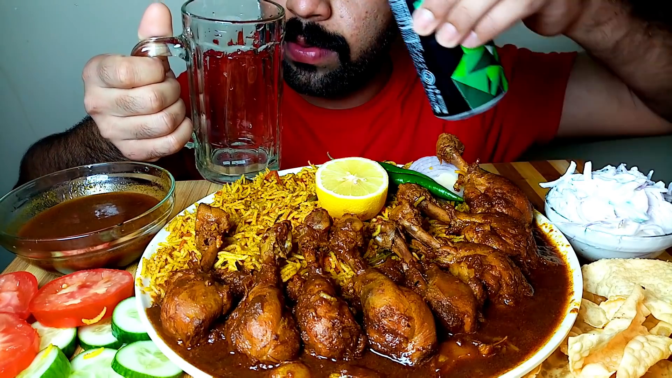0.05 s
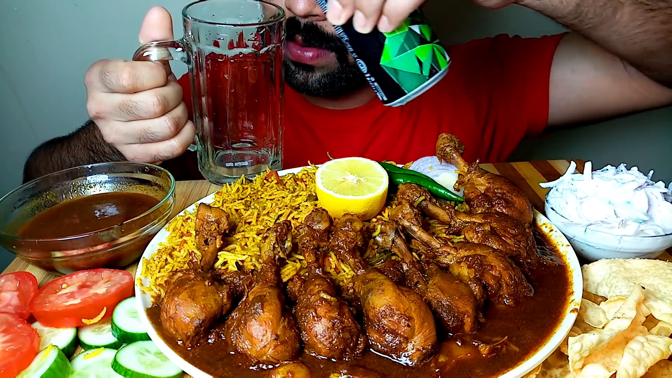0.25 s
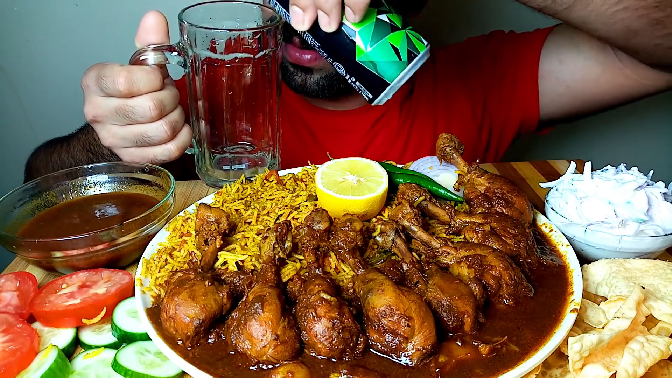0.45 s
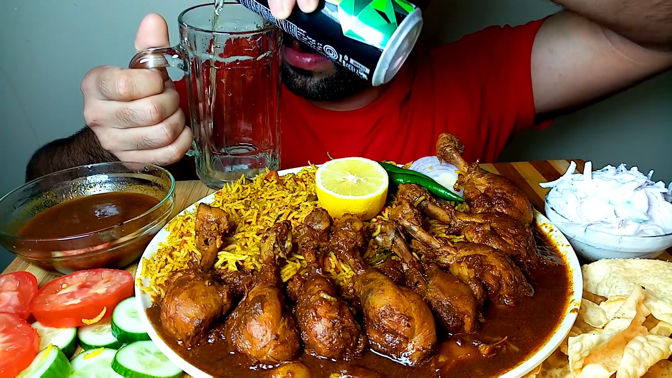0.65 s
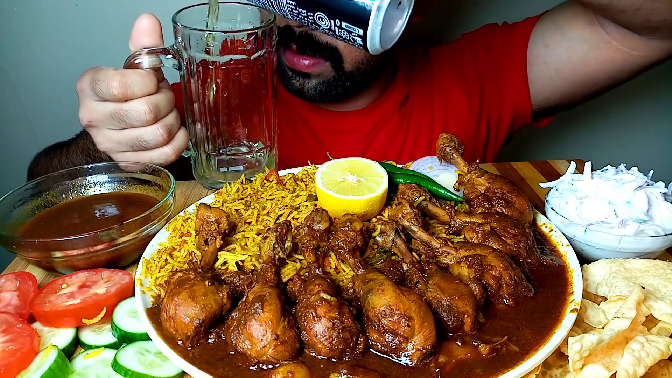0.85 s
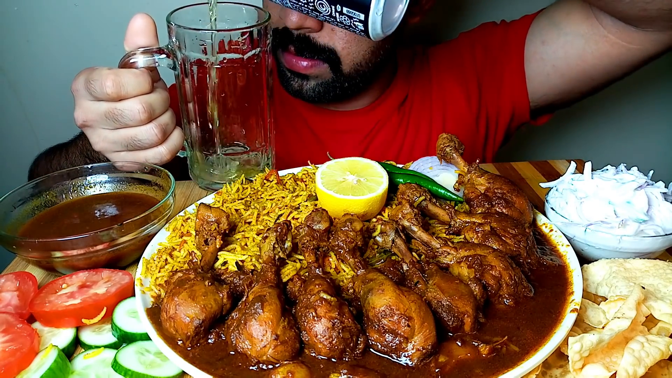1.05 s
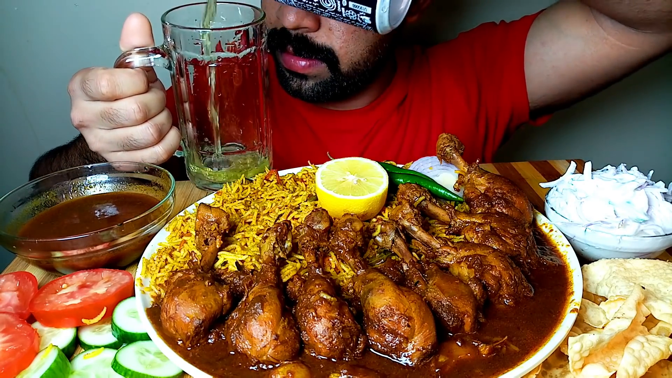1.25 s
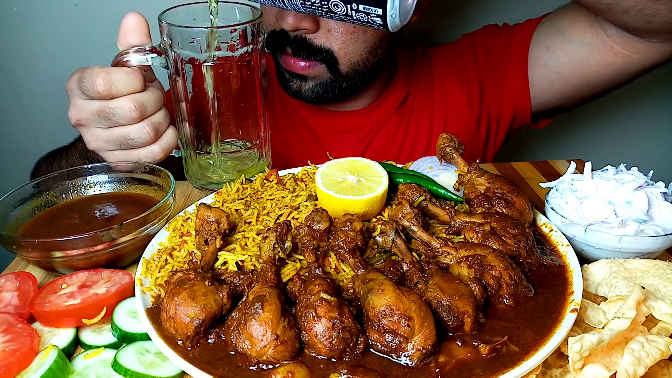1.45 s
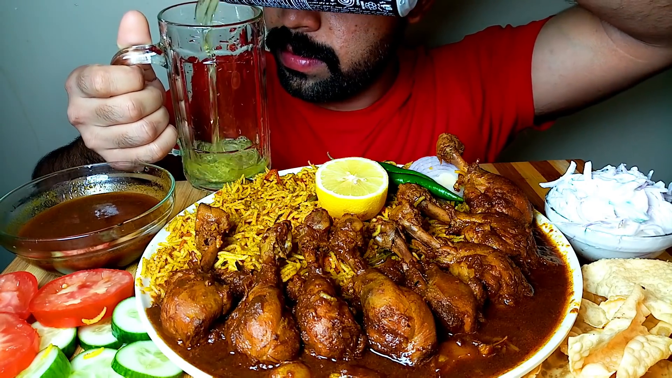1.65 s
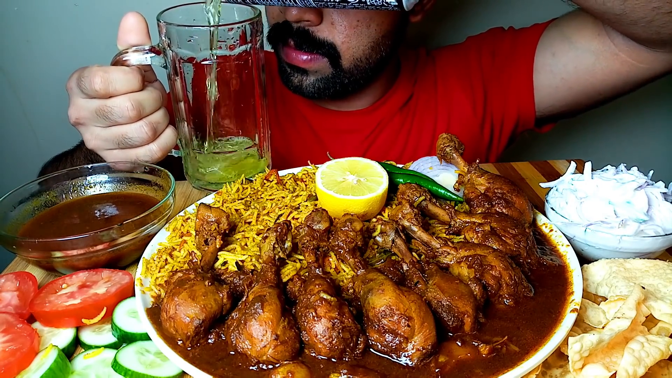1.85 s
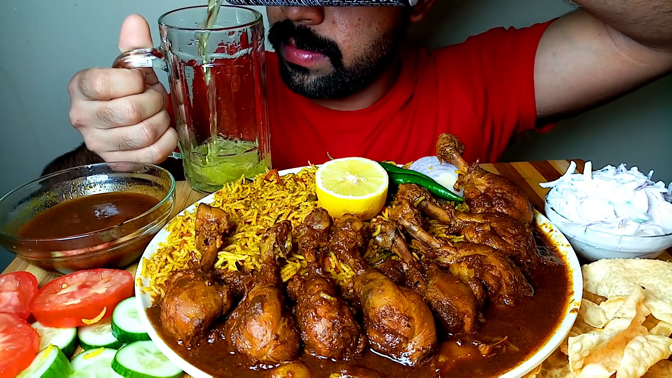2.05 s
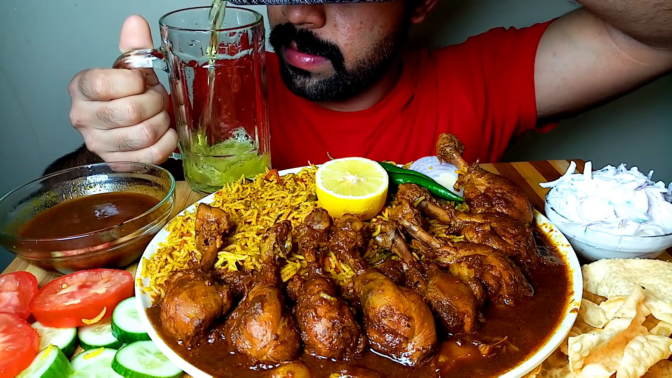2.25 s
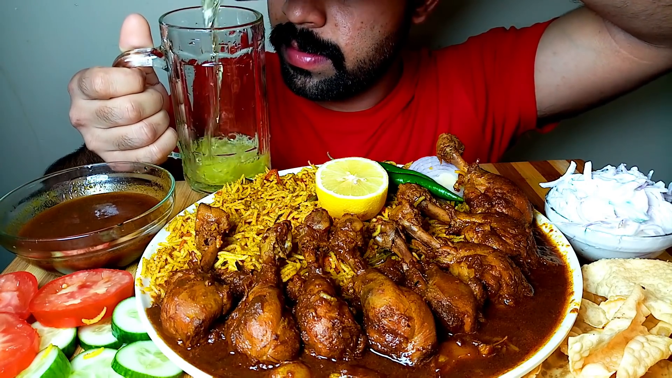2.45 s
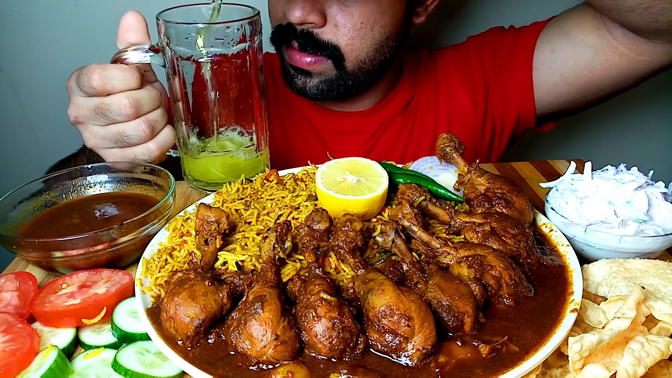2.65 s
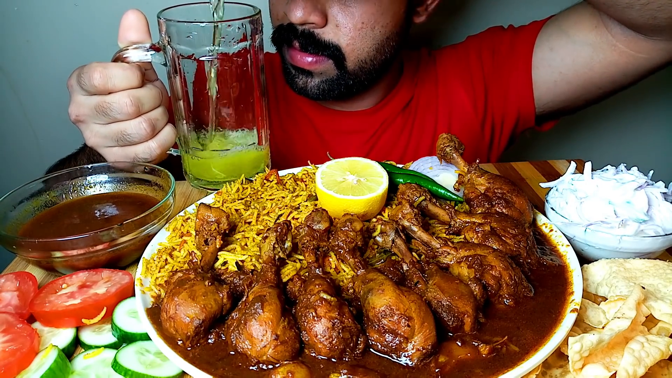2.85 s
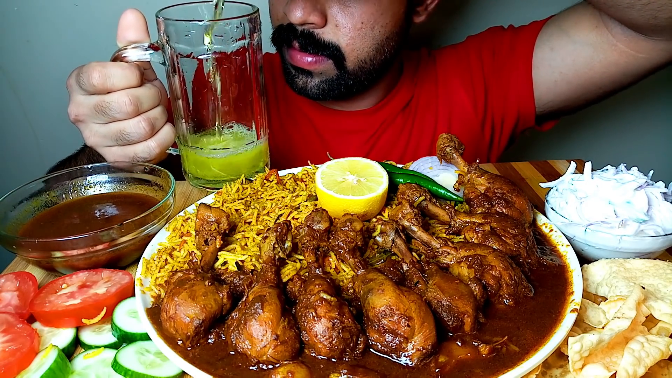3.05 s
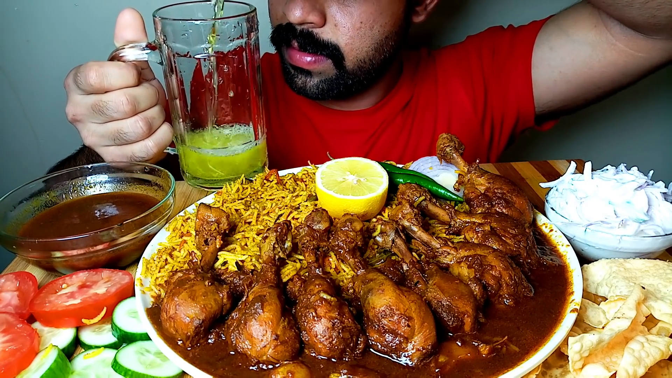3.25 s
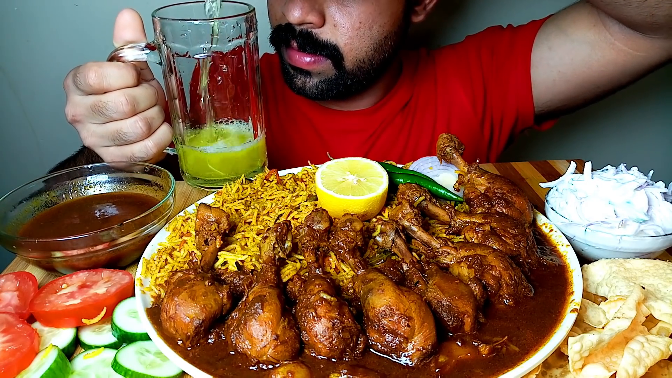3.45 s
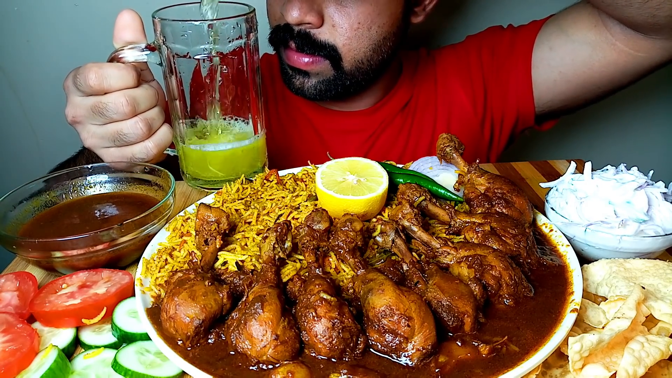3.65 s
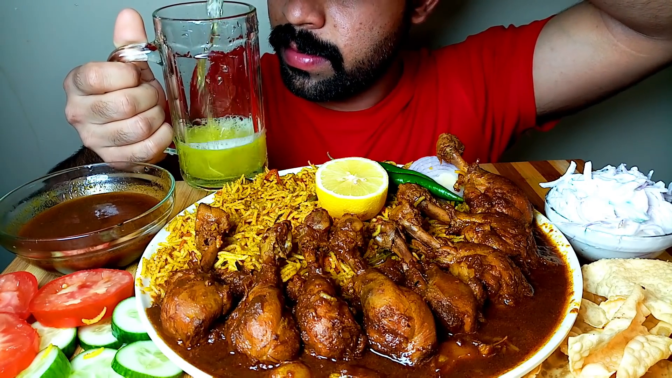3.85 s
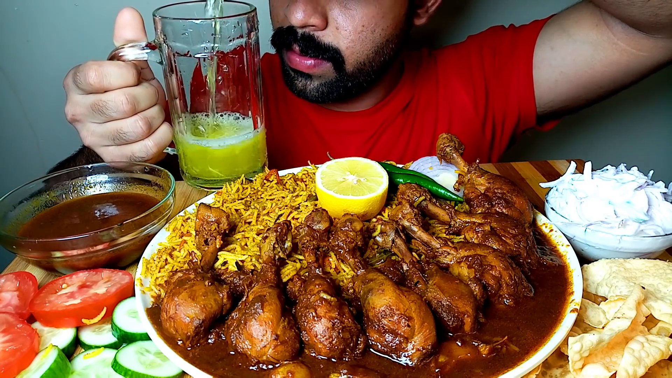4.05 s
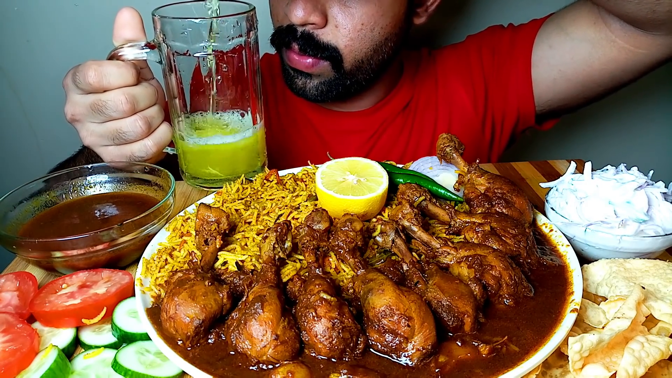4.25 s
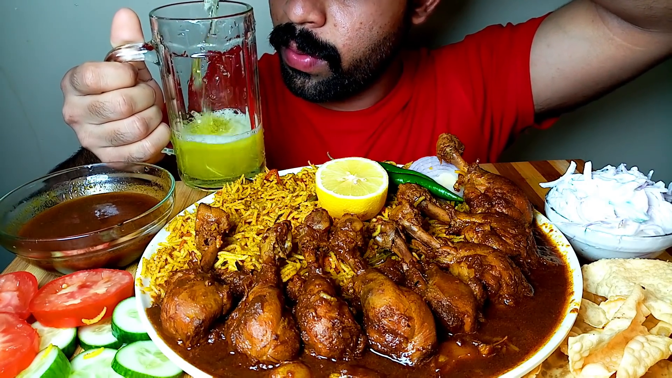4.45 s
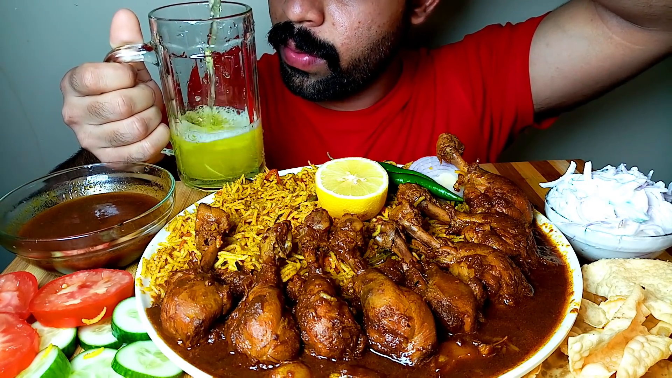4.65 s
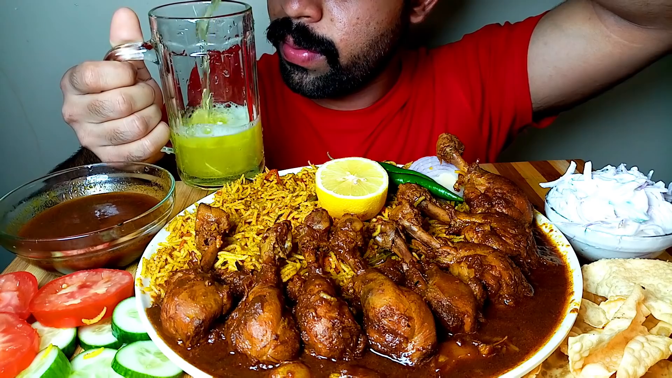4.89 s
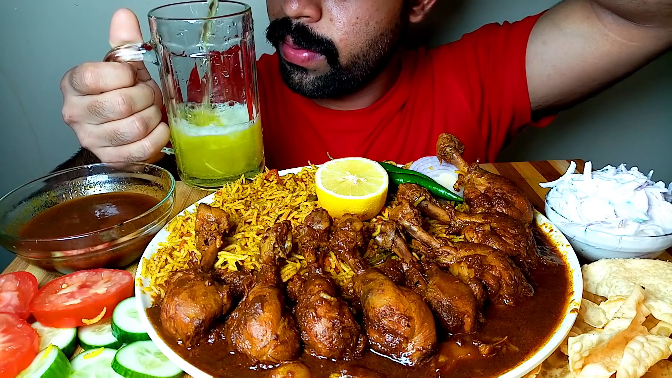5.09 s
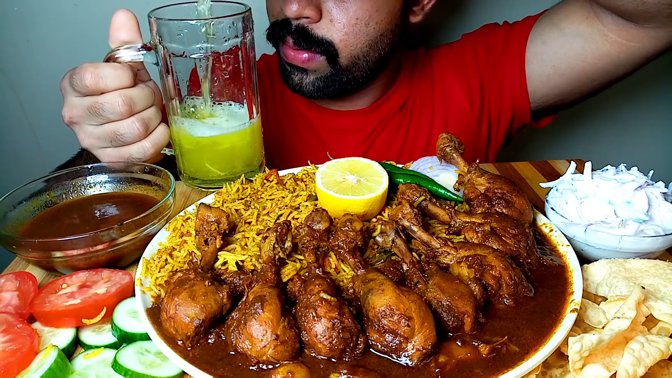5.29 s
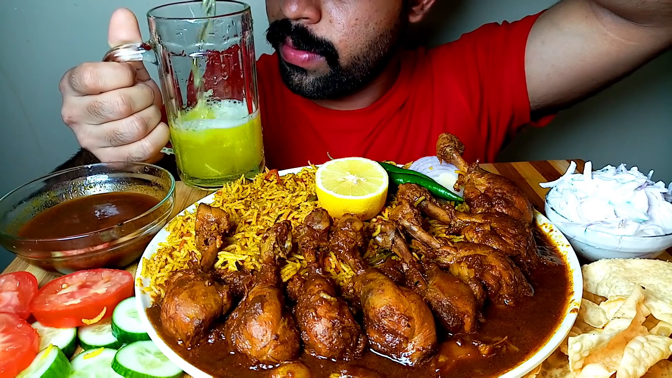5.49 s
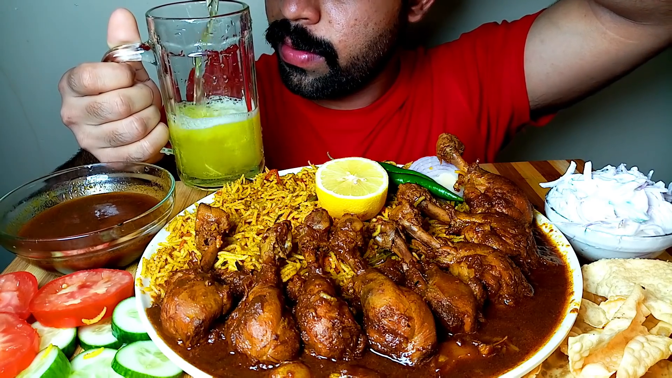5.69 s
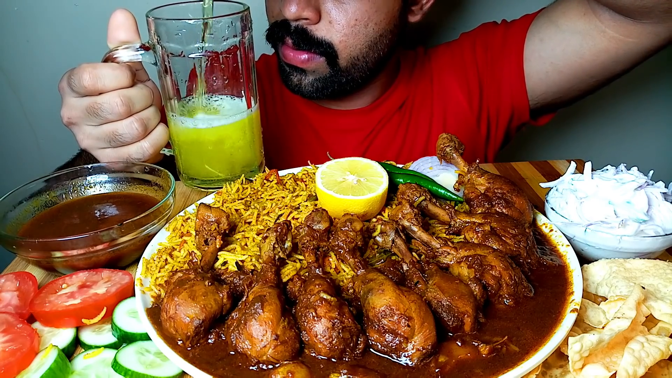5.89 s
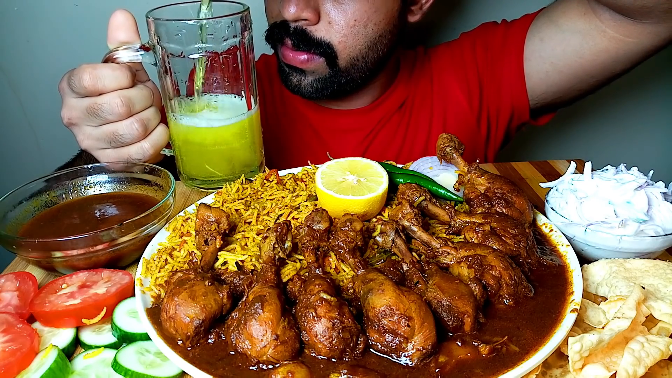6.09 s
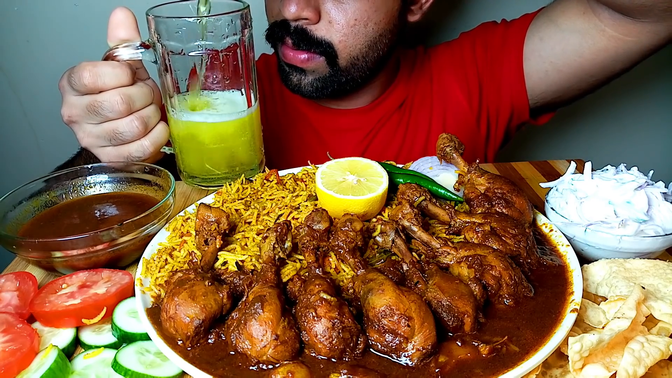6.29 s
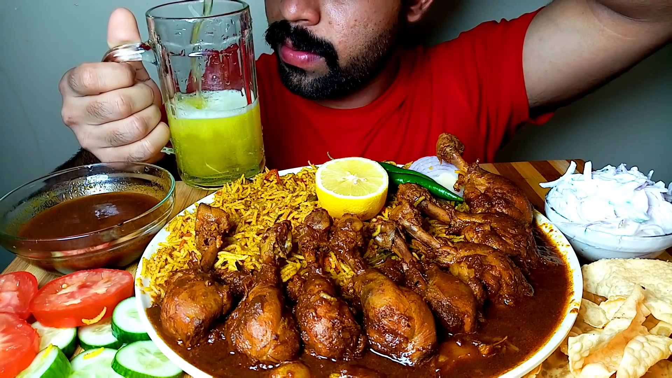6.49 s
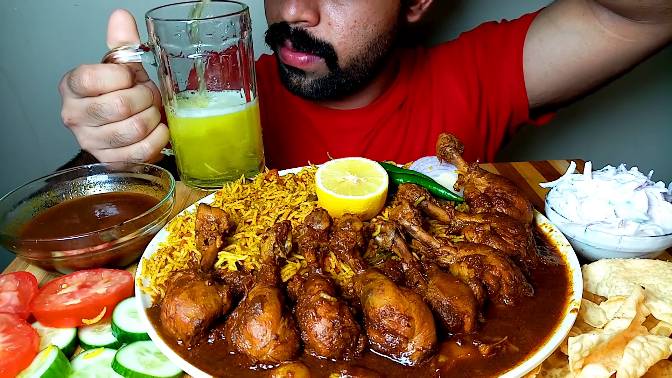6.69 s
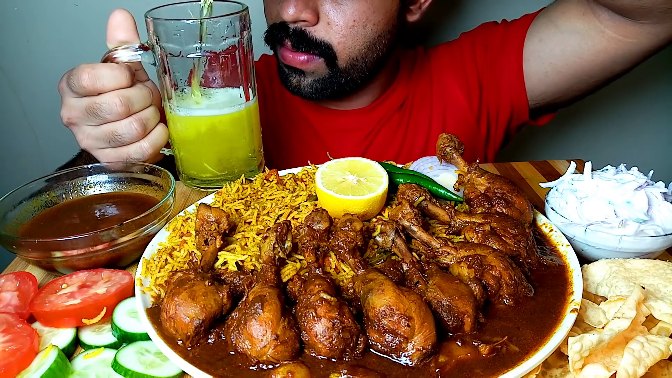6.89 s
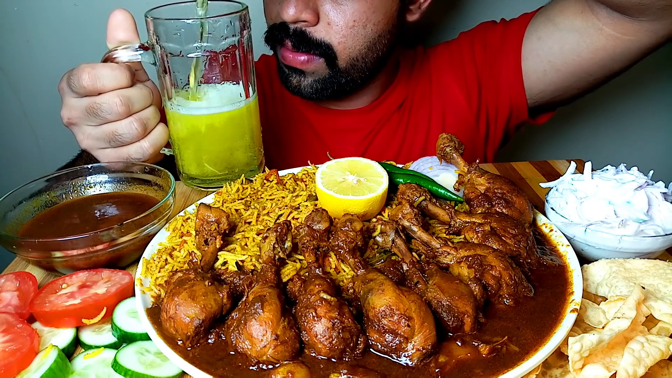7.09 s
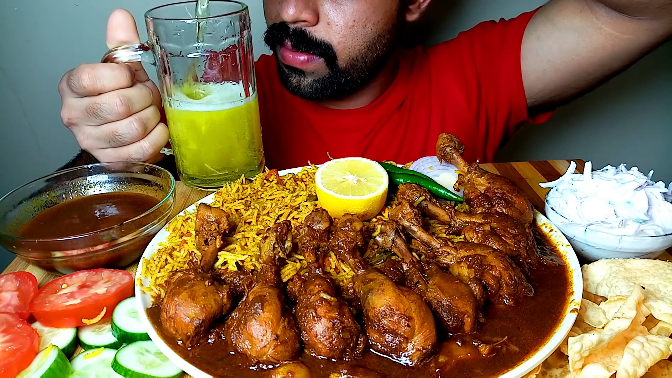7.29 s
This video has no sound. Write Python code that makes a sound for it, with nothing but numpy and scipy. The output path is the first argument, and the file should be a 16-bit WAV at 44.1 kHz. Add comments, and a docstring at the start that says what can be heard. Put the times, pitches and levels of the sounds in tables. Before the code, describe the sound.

A small hard room with very quiet air and barely audible hum, heard closely in stereo. Light table knocks fall at about 0.06, 0.2 and 0.53 s, with faint rubbing. From 0.8 s the first tiny high bubbles ping; by 1.1 s a thin stream of soda patters on the glass bottom, with a bright ringing resonance, sharp droplets and a burst of fizz around 1.2 s. Two more light knocks come at 1.9 and 2.1 s, with dull faint rumble as the mug shifts. Plops begin near 2.1 s, and from 2.75 s dense, irregular, hollow gulps dominate, strongest until about 4 s, rising gradually in pitch while deeper bubbling sinks. Splashes, crackle and fine hiss surround them. After 5 s gulps become more scattered, with a cluster around 5.5 and another near 6.2; then softer small plops and fading fizz continue to 7.3 s.

```python
"""Light knocks at a table and faint rubbing over still room air are heard first; then soda is poured into a mug.
The stream patters on the bare bottom (a resonance driven by clicks), then plunges and gulps air.
Each gulp is a choked pulse that sets the air column ringing, at a pitch that climbs as the mug fills.
Single bubbles are short decaying tones; splashing, fizz and spray are swarms of small resonators.
A small, hard-walled room answers with dense echoes that die away band by band."""
import sys
import numpy as np
from scipy import signal
from scipy.fft import rfft, irfft, next_fast_len
from scipy.io import wavfile

SR = 44100
rng = np.random.default_rng(int(sys.argv[2]) if len(sys.argv) > 2 else 0)


def dump_mix(stems):
    """Bounce the given channels to the path in sys.argv[1] as a 16-bit WAV at rate SR."""
    frames = np.atleast_2d(stems).T  # one column per channel
    limited = np.clip(frames, -1, 1)  # hard clip at full scale
    pcm = np.round(limited * 32767).astype(np.int16)
    wavfile.write(sys.argv[1], SR, pcm)


N = 323253
TIME = np.arange(N) / SR

# pitch of the air column as the mug fills: (time [s], frequency [Hz])
FILLING = [(1.2, 597), (2.9, 652), (3.6, 664), (4.3, 728), (5.0, 744), (6.2, 792), (7.33, 874)]
# pitch of the bubble cloud, which grows and sinks in pitch: (time [s], frequency [Hz])
CLOUD_PITCH = [(2.0, 983), (2.9, 586), (3.7, 498), (4.4, 463), (4.7, 369), (5.2, 418), (6.2, 285),
               (7.33, 250)]
# how hard the stream plunges, before gains: (time [s], air column level [dB], bubble cloud level [dB])
PLUNGING = [(0.8, -84, -101), (1.91, -61.5, -78), (2.55, -59, -67), (2.96, -48, -59), (3.36, -56.5, -63),
            (3.75, -53, -51.5), (4.33, -54, -55), (4.89, -54.5, -58.5), (5.29, -59, -62),
            (5.62, -51.5, -56.5), (6.02, -54.5, -69.5), (6.2, -61, -62), (6.38, -57, -73),
            (6.55, -60.5, -71.5), (7.33, -61, -91)]
# how hard the drink froths, before gains: (time [s], splashing level [dB], fizz level [dB])
FROTHING = [(0.8, -87, -76), (0.91, -104, -72), (1.02, -82, -72), (1.13, -79, -71), (1.24, -89, -51),
            (1.43, -63, -63.5), (1.91, -59, -57), (2.42, -56, -60.5), (2.75, -55.5, -54),
            (2.85, -57.5, -58.5), (3.8, -61, -59.5), (4.05, -60.5, -57), (5.11, -62, -59.5),
            (5.69, -68, -60), (6.4, -67, -63.5), (6.87, -66.5, -68.5), (7.33, -73, -64.5)]


def from_db(db):
    """Amplitude gain is ten to the power of decibels over twenty."""
    return 10 ** (np.asarray(db) / 20)


def rms_one(x):
    """Normalise the mean power: scale to unit rms."""
    return x / np.sqrt(np.mean(x ** 2) + 1e-20)


def in_time(rows, t=TIME):
    """Interpolate each column of a curve linearly at the times t."""
    s, *columns = np.transpose(rows)
    return [np.interp(t, s, c) for c in columns]


def at_hz(points, hz):
    """Interpolate a spectrum on a log-frequency axis."""
    f, value = np.transpose(points)
    return np.interp(np.log(hz + 1e-3), np.log(f), value)


def colour(x, spectrum):
    """Minimum-phase filtering: folding the cepstrum gives a dB spectrum a causal response."""
    n = 2 * next_fast_len(x.shape[-1])
    gain = from_db(at_hz(spectrum, np.fft.rfftfreq(n, 1 / SR)))
    cepstrum = irfft(np.log(gain))
    cepstrum[1:n // 2] *= 2
    cepstrum[n // 2 + 1:] = 0
    return irfft(rfft(x, n) * np.exp(rfft(cepstrum)))[..., :x.shape[-1]]


def add(track, s, sound):
    """Superposition: mix a sound into a track at time s."""
    i = max(round(s * SR), 0)
    track[i:i + len(sound)] += sound[:N - i]


def drift(rate):
    """Slow random modulation: lines between normal deviates of spread 1, `rate` of them a second."""
    knots = rng.standard_normal(N // 100)
    return np.interp(TIME * rate, np.arange(len(knots)), knots)


def random_times(start_s, per_s):
    """A random scatter of independent moments from start_s to the end, on a 10 ms grid."""
    slots = np.arange(0, N / SR, .01)
    return slots[(rng.random(len(slots)) < per_s * slots[1]) & (slots > start_s)]


def grains(per_s, spread_db):
    """Shot noise: random clicks of either sign, many small and a few large; rms 1."""
    steps = np.minimum(rng.exponential(1, N), 4.5)
    sizes = from_db(spread_db * steps) * rng.choice([-1, 1], N)
    return rms_one(sizes * (rng.random(N) < per_s / SR))


def resonate(x, hz, width_hz):
    """A moving resonance by heterodyning: shift hz down to zero, low-pass, shift back; rms 1."""
    turn = np.exp(2j * np.pi * np.cumsum(hz) / SR)
    r = np.exp(-np.pi * width_hz * np.sqrt(2) / SR)
    envelope = signal.lfilter([1], [1, -2 * r, r * r], x / turn)
    return rms_one((envelope * turn).real)


def bubble_swarm(spectrum, per_s, spread_db, cycles):
    """Impulses excite damped resonators of many pitches, each falling 60 dB in `cycles` cycles; rms 1."""
    clicks, pitches = grains(per_s, spread_db), np.geomspace(900, 16000, 36)
    dealt, out = rng.integers(0, len(pitches), N), np.zeros(N)
    for k, hz in enumerate(pitches):
        r, w = from_db(-60 * hz / (cycles * SR)), 2 * np.pi * hz / SR
        # the tiny additions keep an empty band from being silent
        struck = clicks * (dealt == k) + 1e-12 * clicks[::-1] + 1e-18
        ringing = signal.lfilter([1, 0, -1], [1, -2 * r * np.cos(w), r * r], struck)
        out += np.sqrt(hz) * rms_one(ringing)
    return rms_one(colour(out, spectrum))


def swell(t, rise, attack=0.79, choke=2.26):
    """A transient envelope: brisk onset, peak of height 1 after the rise time, then soon choked."""
    return (t / rise) ** attack * np.exp(attack / choke * (1 - (t / rise) ** choke))


def diffuse(size):
    """A diffuse field at two microphones: random-phase spectra with a set coherence between them."""
    # left-right likeness of the field: (frequency [Hz], likeness [-1 to 1])
    likeness = [(60, 0.51), (300, 0.82), (650, 0.33), (1400, 0), (3000, 0.12), (16000, 0)]
    hz = np.fft.rfftfreq(size, 1 / SR)
    alike = np.clip(at_hz(likeness, hz), -1, 1)
    mid, side = np.exp(2j * np.pi * rng.random((2, len(hz))))
    return hz, np.sqrt((1 + alike) / 2) * mid + np.sqrt((1 - alike) / 2) * side * [[1], [-1]]


def background(air_db=-74.5):
    """Still room air as a diffuse noise field, with steady sinusoids of hum and a thin whine."""
    # spectrum of the still air: (frequency [Hz], density [dB per Hz])
    quiet = [(15, -26), (25, -3), (43, -11), (87, 2), (277, -1), (818, -14), (1330, -16.5), (3160, -19.5),
             (3520, -20), (5880, -22), (10100, -29.5), (14800, -30), (16000, -35)]
    # steady hum and thin whine: (frequency [Hz], rms level [dB])
    hum_tones = [(49, -89), (98, -85), (3200, -97)]
    air = rms_one(colour(irfft(diffuse(size=N)[1], N), quiet))
    hum = sum(from_db(db) * np.sqrt(2) * np.sin(2 * np.pi * (hz * TIME + rng.random()))
              for hz, db in hum_tones)
    return from_db(air_db) * air + hum


def handling(swells, spectrum):
    """Friction noise: coloured noise under swells of bell shape."""
    level = sum(from_db(db) * np.exp(-((TIME - s) / half_s) ** 2) for s, db, half_s in swells)
    return level * rms_one(colour(rng.standard_normal(N), spectrum))


def rustles():
    """Friction of light contact: faint rubbing as the can is lifted."""
    # swells of rubbing: (time of the height [s], rms level [dB], half-length [s])
    swells = [(0.2, -80, 0.14), (0.552, -78, 0.025)]
    # spectrum of the rubbing: (frequency [Hz], density [dB per Hz])
    spectrum = [(300, -16), (650, 4), (900, 6), (1300, -14), (2800, -15), (4000, -25)]
    return handling(swells, spectrum)


def knocks(soft_s=0.0033):
    """Modal excitation: every knock rings the table's damped modes with strengths of its own."""
    # light knocks at the table: (time [s], level before mode gains [dB])
    blows = [(0.063, -63.5), (0.2, -76), (0.534, -56), (1.907, -52), (2.081, -53)]
    # modes of the table: (frequency [Hz], relative level [dB], 60 dB decay time [s])
    modes = [(194, -11, 0.25), (291, -2, 0.12), (342, -3.5, 0.12), (711, -8, .08), (860, -15, 0.072),
             (2010, -1, 0.022), (2740, 5, 0.016)]
    out, t = np.zeros(N), np.arange(SR // 3) / SR
    onset = 1 - np.exp(-t / soft_s)
    for s, db in blows:
        for hz, mode_db, t60 in modes:
            level_db = db + mode_db - 2.5 + rng.normal(0, 0.88)
            add(out, s, from_db(level_db - 60 * t / t60) * np.sin(2 * np.pi * hz * t) * onset)
    return out


def strays(start_s=1.05, per_s=16, over_fizz_db=7.5, spread_db=8, low_hz=3110, high_hz=9330,
           splash_below_db=23.5):
    """Fainter random bubbles, their strength following the fizz: (s, level dB, Hz, splash dB)."""
    s = random_times(start_s, per_s)
    size, pitch = rng.random((len(s), 2)).T
    db = in_time(FROTHING, s)[1] + over_fizz_db + spread_db * (size - .5)
    hz = low_hz * (high_hz / low_hz) ** pitch
    return list(zip(s, db, hz, db - splash_below_db))


def pings(ring_cycles=36, ping_db=5, cluster_db=-11.5, cluster_s=0.0039, splash_db=-3, splash_s=0.0058,
          chirp=0.079):
    """Bubbles as damped oscillators, small ones dying sooner, pitch rising slightly: (rings, scatter)."""
    # loud single bubbles and drops, before gains: (time [s], level [dB], frequency [Hz], splash level [dB])
    loud = [(0.7112, -70, 9400, -82), (0.8303, -56, 9475, -82), (0.8558, -38, 4450, -77),
            (0.8566, -46, 7120, -77), (0.9538, -39, 7340, -79), (1.0307, -52, 4330, -76),
            (1.0621, -41, 9300, -55), (1.064, -49, 2510, -60), (1.0988, -41, 6470, -52),
            (1.1494, -31.5, 9330, -57.5), (1.1742, -36.5, 6620, -52), (1.1855, -41, 7000, -55),
            (1.213, -25.5, 6290, -64), (1.256, -26, 3090, -45), (1.297, -48, 6000, -41),
            (1.4619, -50, 5430, -53), (1.4729, -42, 10900, -69), (1.4931, -28, 5660, -46),
            (1.601, -37, 5500, -49), (1.6162, -30.5, 2870, -45), (1.7057, -44, 4030, -48),
            (1.7368, -40, 9000, -50), (1.775, -45, 6040, -58), (1.7521, -40, 9000, -57),
            (1.8359, -42, 7300, -47), (1.909, -30, 3020, -46.5), (1.915, -45, 5900, -63),
            (2.0229, -42, 4460, -65), (2.039, -33, 4070, -54), (2.052, -48, 4060, -47),
            (2.1055, -41, 4370, -48), (2.1156, -43, 9100, -48.5), (2.2457, -35, 3070, -65),
            (2.3516, -33, 8260, -41), (2.3746, -21.5, 3200, -47), (2.387, -29.5, 3350, -59),
            (2.402, -34, 3200, -62), (2.5483, -56, 8270, -58), (2.5577, -32, 5310, -46),
            (2.6588, -29, 6700, -42), (2.7778, -32, 5640, -59), (2.8065, -32, 4460, -57),
            (2.848, -35, 4860, -47.5), (2.898, -36.5, 8100, -58), (2.9429, -37.5, 5900, -58),
            (3.044, -40, 6960, -59), (3.08, -41, 3950, -63), (3.103, -32.5, 1990, -35),
            (3.12, -41, 2110, -52), (3.23, -52, 6300, -56), (3.2413, -37, 8560, -60),
            (3.2889, -39, 6850, -43), (3.3314, -36, 5630, -50), (3.3553, -32.5, 5720, -48),
            (3.3836, -35.5, 5760, -44), (3.4532, -41, 5560, -47.5), (3.5156, -36, 6630, -45),
            (3.7115, -42, 5230, -56), (3.8065, -31, 5700, -45.5), (3.8515, -35, 5970, -53),
            (3.976, -35, 6070, -41), (3.9874, -39, 6600, -63), (4.118, -42, 6300, -47.5),
            (4.2311, -36, 6640, -48), (4.3863, -38, 4500, -44.5), (4.2049, -45, 2380, -54),
            (4.2238, -40, 2400, -52), (4.4315, -54, 5730, -55), (4.5785, -44, 2180, -67),
            (4.589, -45, 2060, -54), (4.5878, -35.5, 5470, -55), (4.7335, -34, 4450, -48.5),
            (4.8348, -44, 5600, -47), (5.0934, -50, 8600, -78), (5.1887, -43, 6500, -40.5),
            (5.2811, -38, 2230, -48.5), (5.3255, -43, 4900, -53), (5.4028, -39, 6140, -43),
            (5.6597, -32, 4380, -44), (5.682, -42, 3500, -53), (5.7216, -33, 6470, -47.5),
            (5.7619, -35.5, 5620, -61), (5.8212, -41, 2260, -57), (5.8339, -36.5, 5830, -48.5),
            (6.0497, -40, 1500, -68), (6.0995, -56, 1560, -55), (6.0539, -41, 5440, -67),
            (6.1398, -42, 8440, -51), (6.1772, -28, 5440, -39.5), (6.3882, -48, 8800, -64),
            (6.414, -41, 9050, -54), (6.4144, -45, 2430, -67), (6.6185, -46, 5800, -70),
            (6.7444, -51, 4360, -70), (6.7678, -46, 5640, -57), (6.9365, -56, 5550, -50.5),
            (7.2722, -46, 5400, -60)]
    # spectrum of the scattered droplets: (frequency [Hz], relative level [dB])
    burst = [(1200, -30.5), (2200, 9), (4000, 9.5), (6300, 11), (9000, 7.5), (13000, -7), (15100, 1.5),
             (15900, -26)]
    out, splash, t = np.zeros(N), np.zeros(N), np.arange(SR // 10) / SR
    for s, db, hz, burst_db in list(loud) + strays():
        t60 = ring_cycles / hz
        phase = 2 * np.pi * hz * t * (1 + chirp * (np.minimum(t / t60, 1) - .2))
        # fragments: narrow-band noise centred on the bubble's own pitch
        narrow = signal.butter(2, 0.15 * hz, fs=SR, output="sos")
        wander = signal.sosfilt(narrow, rng.standard_normal((2, len(t))))
        fragments = rms_one(wander[0] * np.cos(phase) + wander[1] * np.sin(phase))
        fragments = fragments * np.exp(-t / cluster_s)
        ring = from_db(-60 * t / t60) * np.sin(phase)
        onset = 1 - np.exp(-t * hz)
        add(out, s, from_db(db + ping_db) * (ring + from_db(cluster_db) * fragments) * onset)
        add(splash, s, from_db(burst_db + splash_db) * np.exp(-t / splash_s) * 2)
    return out, splash * bubble_swarm(burst, per_s=8300, spread_db=1.0, cycles=13.3)


def trickle(column_db, cloud_db, splash_db, column_gain_db=-4, cloud_gain_db=-3, overtone_gain_db=-4,
            overtone_fade_db_per_s=6.5, flutter_db=3, column_slosh=0.028, cloud_slosh=0.052,
            sloshes_per_s=18, head_from_s=4.5, head_grow_s=2, head_widens=2.4):
    """Forced resonance: patter drives the sloshing air column and bubble cloud; foam damps the column."""
    # modes of the air column: (multiple of its pitch, width [Hz], level [dB])
    column_modes = [(1, 58, 9), (1.24, 120, -3.5), (1.55, 200, -40)]
    # its overtones: (multiple of its pitch, width [Hz], level [dB])
    overtones = [(2.7, 154, 19), (4.65, 260, -13)]
    pitch = in_time(FILLING)[0] * (1 + column_slosh * drift(sloshes_per_s))
    cloud_hz = in_time(CLOUD_PITCH)[0] * (1 + cloud_slosh * drift(sloshes_per_s))
    patter = grains(per_s=700, spread_db=6.0) * from_db(flutter_db * drift(35))

    def ring(modes, widen=1):
        """Modal sum: the patter through every mode, rms 1."""
        return rms_one(sum(from_db(db) * resonate(patter, k * pitch, widen * width)
                           for k, width, db in modes))

    # the growing head of foam widens the modes
    head = np.clip((TIME - head_from_s) / head_grow_s, 0, 1)
    low = (1 - head) * ring(column_modes) + head * ring(column_modes, head_widens)
    high = ring(overtones)
    cloud = resonate(patter, cloud_hz, width_hz=80)
    overtone_db = splash_db + overtone_gain_db - overtone_fade_db_per_s * TIME
    column = from_db(column_db + column_gain_db) * low + from_db(overtone_db) * high
    return column + from_db(cloud_db + cloud_gain_db) * cloud


def foam(splash_db, fizz_db, splash_gain_db=-2, fizz_gain_db=-5.5, spray_below_fizz_db=9.5,
         spray_fade_db_per_s=1.9, surge_db=2.6, surges_per_s=60):
    """Size sets pitch: splashing, fizz and finest spray are three bubble swarms in quick surges."""
    # spectra of the splashing, fizz and spray: (frequency [Hz], relative level [dB])
    splash_spectrum = [(500, -4), (1200, -1), (1700, -11.5), (2400, 3.5), (3200, 11), (4200, 12.5),
                       (6000, -24)]
    fizz_spectrum = [(2000, -22), (3200, -22), (4200, 2), (5800, 10), (7000, 3), (9000, 6), (11500, -11.5),
                     (14000, -54), (16500, -21)]
    spray_spectrum = [(8000, -20), (11500, -5), (13300, -13), (14100, -5), (14800, 2), (15400, 0),
                      (15850, -28)]
    # the growing head of foam catches the spray
    spray_db = fizz_db - spray_below_fizz_db - spray_fade_db_per_s * TIME
    splash = bubble_swarm(splash_spectrum, per_s=1500, spread_db=7.5, cycles=19.6)
    fizz = bubble_swarm(fizz_spectrum, per_s=3000, spread_db=6.5, cycles=39)
    spray = bubble_swarm(spray_spectrum, per_s=4200, spread_db=3, cycles=8)
    froth = from_db(splash_db + splash_gain_db) * splash + from_db(fizz_db + fizz_gain_db) * fizz
    return (froth + from_db(spray_db) * spray) * from_db(surge_db * drift(surges_per_s))


def crackle(fizz_db, below_fizz_db=2.5):
    """Impulsive radiation: separate bubbles burst on top of the foam, each a short dry tick."""
    # spectrum of the bursting bubbles: (frequency [Hz], relative level [dB])
    spectrum = [(1200, -9), (2300, 1), (3200, 3), (4400, 3), (6200, 1), (9000, 6), (11500, -5),
                (15500, -17)]
    return from_db(fizz_db - below_fizz_db) * bubble_swarm(spectrum, per_s=85, spread_db=4.5, cycles=6.7)


def rumbles():
    """Low-frequency friction noise: dull rumbles as the mug is shifted."""
    # swells of rumble: (time of the height [s], rms level [dB], half-length [s])
    swells = [(1.1, -72, .12), (2.27, -73.5, 0.095), (6.05, -70, 0.09)]
    # spectrum of the rumble: (frequency [Hz], density [dB per Hz])
    spectrum = [(20, -12), (50, 11), (110, 8), (220, -25), (600, -57)]
    return handling(swells, spectrum)


def snaps(t60=0.01, gain_db=-3):
    """Smallest size, highest pitch: the tiniest bubbles burst as sharp decaying ticks of noise."""
    # tiny bubbles snapping: (time [s], level before the gain [dB])
    bursts = [(0.9087, -49), (1.0967, -38.5), (1.15, -47), (1.213, -44), (1.268, -36), (1.7381, -36),
              (3.1025, -45), (3.9773, -39), (4.893, -30), (6.176, -30.5)]
    # spectrum of a snap: (frequency [Hz], relative level [dB])
    spectrum = [(7000, -17), (12500, -7.5), (14600, -3), (15400, 3), (16200, -2)]
    level, t = np.zeros(N), np.arange(SR // 50) / SR
    for s, db in bursts:
        add(level, s, from_db(db + gain_db - 60 * t / t60))
    return level * rms_one(colour(rng.standard_normal(N), spectrum))


def bottom(from_s=1.05, rise_s=0.22, start_db=-67, fade_db_per_s=2, centre_hz=1680, width_hz=220,
           flutter_db=4, slosh=0.016, drop_t60=0.045, drop_rise_s=0.0011):
    """Impact resonance: drops ring the nearly empty mug; the patter fades as the drink rises."""
    # drops striking the nearly empty mug: (time [s], level [dB], frequency [Hz])
    drops = [(1.1, -54.5, 1640), (1.296, -41.5, 1613), (1.336, -54, 1760), (1.432, -47, 1640),
             (1.626, -39, 1700), (1.7043, -38, 1620), (1.766, -48, 1734), (1.985, -44, 1680)]
    age, t = np.maximum(TIME - from_s, 0), np.arange(SR // 10) / SR
    level = from_db(start_db - fade_db_per_s * age) * np.minimum(age / rise_s, 1)
    patter = grains(per_s=330, spread_db=3.5) * from_db(flutter_db * drift(30))
    out = level * resonate(patter, centre_hz * (1 + slosh * drift(25.1)), width_hz)
    onset = 1 - np.exp(-t / drop_rise_s)
    for s, db, hz in drops:
        add(out, s, from_db(db - 60 * t / drop_t60) * onset * np.sin(2 * np.pi * hz * t))
    return out


def gurgles(start_s=1.3, per_s=50, over_splash_db=6, spread_db=10, multiple=2.87, octaves=0.65,
            swell_cycles=2.57):
    """Choked oscillation: mid-sized bubbles near the first overtone swell and stop in a few cycles."""
    out, t, times = np.zeros(N), np.arange(SR // 20) / SR, random_times(start_s, per_s)
    for s, (size, pitch) in zip(times, rng.random((len(times), 2))):
        hz = in_time(FILLING, s)[0] * multiple * 2 ** (octaves * (pitch - .5))
        # their strength follows the splashing
        db = in_time(FROTHING, s)[0] + over_splash_db + spread_db * (size - .5)
        add(out, s, from_db(db) * swell(t, swell_cycles / hz) * np.sin(2 * np.pi * hz * t))
    return out


def all_gulps(plop_swell_s=0.0028, plop_cloud_below_db=18, small_from_s=2.6, small_per_s=5.1,
              over_plunge_db=12.5, small_swell_s=0.0031, spread_db=3, detune=0.11, splash_below_db=24):
    """Air entrainment as events: loud gulps, plops and random small gulps, in the columns of the gulps."""
    # loud gulps near the pitch of the air column, levels before gains:
    # (time [s], level [dB], frequency [Hz], swell time [s], bubble cloud level [dB], splash level [dB])
    loud = [(2.7584, -37, 740, 0.0037, -48, -62), (2.7776, -23.5, 692, 0.0052, -45, -58),
            (2.8197, -21, 676, 0.0075, -30, -50), (2.898, -19.5, 692, 0.0054, -47, -54),
            (2.9751, -25.5, 686, 0.0068, -46, -75), (3.0108, -27, 687, 0.0076, -60, -66.0),
            (3.0268, -33.5, 654, 0.0068, -57, -69), (3.1019, -24.5, 705, 0.0074, -41, -55),
            (3.129, -25, 720, 0.0029, -47, -50), (3.1618, -27, 686, 0.0059, -31, -68),
            (3.208, -48, 673, 0.0026, -46, -69), (3.24, -37.5, 666, 0.004, -44, -64),
            (3.2885, -33.5, 746, 0.0081, -56, -51), (3.3338, -21, 709, 0.0058, -53, -59),
            (3.3816, -35.5, 659, 0.007, -39.5, -52), (3.4635, -33.5, 683, 0.0039, -46, -58),
            (3.5115, -23.5, 683, 0.0105, -32, -52), (3.5613, -25.5, 690, 0.0046, -28, -54),
            (3.6321, -20.5, 710, 0.0058, -37, -50), (3.717, -37, 694, 0.0041, -50, -64),
            (3.7287, -23, 683, 0.0076, -47, -63.0), (3.7534, -25, 700, 0.0055, -28, -58),
            (3.8115, -31.5, 723, 0.0024, -38, -56), (3.8467, -30, 717, 0.0056, -38.5, -50),
            (3.93, -30.5, 690, 0.0028, -36, -64), (3.9745, -34, 703, 0.0068, -33, -50.5),
            (4.027, -34.5, 715, 0.0054, -55, -54), (4.0585, -37.5, 699, 0.0028, -52, -50),
            (4.11, -28.5, 717, 0.0057, -33, -58), (4.1738, -24, 726, 0.0036, -30, -67),
            (4.2668, -30, 710, 0.0064, -33, -53), (4.327, -38.5, 718, 0.0065, -47, -52),
            (4.3853, -28, 704, 0.0044, -38, -49), (4.4358, -31.0, 754, 0.0019, -42, -52),
            (4.5193, -37.5, 711, 0.014, -46.5, -57), (4.5776, -32, 743, 0.0059, -38, -50),
            (4.6243, -34, 730, 0.0079, -37.5, -45), (4.7321, -36.5, 746, 0.005, -48, -50),
            (4.7799, -29.5, 733, 0.0071, -33.5, -61), (4.834, -28, 711, 0.0052, -34.5, -47),
            (4.8908, -35.5, 725, 0.0048, -44, -50), (4.9493, -29, 738, 0.0048, -44, -57),
            (5.0076, -39, 730, 0.0041, -44.5, -48.5), (5.1232, -25.5, 742, 0.0022, -29, -48),
            (5.1822, -36, 735, 0.0038, -37, -46.5), (5.39, -39, 690, 0.0025, -55, -68),
            (5.4056, -29.5, 783, 0.0045, -60, -47.5), (5.4459, -30, 755, 0.0057, -37, -50),
            (5.511, -44, 785, 0.0025, -45, -62), (5.54, -40, 783, 0.0034, -58, -72),
            (5.5498, -28, 800, 0.0029, -50, -57), (5.5592, -26.5, 770, 0.0037, -46, -54),
            (5.577, -41, 785, 0.0019, -58, -69), (5.5996, -35, 784, 0.0064, -60, -74),
            (5.7605, -38, 772, 0.0072, -47, -45), (5.8607, -36, 806, 0.0058, -46.5, -50),
            (5.954, -47, 770, 0.0027, -56, -66), (6.002, -44.5, 830, .0035, -64, -58),
            (6.0415, -51, 780, 0.0035, -68, -66), (6.0527, -41.5, 754, 0.0044, -67, -59),
            (6.0961, -42, 800, 0.0043, -72, -54), (6.1388, -33.5, 775, 0.0041, -38.5, -58),
            (6.1761, -33.5, 805, 0.0035, -47, -54), (6.2101, -24, 758, 0.002, -37, -71),
            (6.4125, -38.5, 790, 0.003, -65, -72)]
    # big bubbles plopping at the surface, levels before gains:
    # (time [s], level [dB], frequency [Hz], splash level [dB])
    plop_rows = [(1.332, -51.5, 630, -71), (1.645, -53, 1070, -56), (1.7321, -51, 674, -56),
                 (1.736, -49, 1060, -71), (1.771, -66, 1100, -66), (1.906, -46.5, 853, -47),
                 (2.1188, -36, 711.0, -43.5), (2.3895, -30.5, 750, -61), (2.563, -42, 936, -49.5),
                 (2.649, -39, 860, -62), (2.6937, -35, 788, -70), (2.7275, -39.5, 726, -59),
                 (3.9232, -32.0, 893, -46), (5.0428, -33, 843, -50), (5.6598, -32.5, 877, -48),
                 (5.832, -35.5, 840, -62), (6.2787, -34.5, 800, -64), (6.4253, -42, 780, -64),
                 (6.434, -40, 820, -68), (6.474, -40, 785, -67), (6.4818, -43, 750, -58),
                 (6.4998, -40.5, 820, -62), (6.5685, -46, 816, -71), (6.621, -44.5, 850, -57),
                 (6.758, -48.5, 760, -64), (6.7963, -40.5, 894, -82), (6.8315, -39, 810, -81),
                 (6.928, -41, 853, -67), (6.9352, -37.5, 925, -53), (6.995, -38.5, 850, -47),
                 (7.0511, -44.5, 920, -67), (7.103, -50.5, 885, -73), (7.2097, -41, 813.0, -86),
                 (7.231, -48, 970, -77)]
    plops = [(s, db, hz, plop_swell_s, db - plop_cloud_below_db, wet_db) for s, db, hz, wet_db in plop_rows]
    # small gulps start once the drink is deep enough
    small, times = [], random_times(small_from_s, small_per_s)
    for s, (size, tune) in zip(times, rng.standard_normal((len(times), 2))):
        db, low_db = np.array(in_time(PLUNGING, s)) + over_plunge_db + spread_db * size
        hz = in_time(FILLING, s)[0] * (1 + detune * tune)
        small.append((s, db, hz, small_swell_s, low_db, db - splash_below_db))
    return list(loud) + plops + small


def glugs(ring_db=-17, ring_t60=0.09, cloud_db=1, cloud_t60=0.059, cloud_rise=0.0011, slap_db=-22.0,
          slap_s=0.0074, low_cut_hz=230, cloud_detune=0.082, neighbour_db=-9, neighbour_spread=0.36,
          splash_db=1, splash_s=0.0096, chirp=0.0083):
    """Coupled oscillators: a gulp pumps the ringing air column, shakes the cloud and throws up a splash."""
    # spectrum of the splash: (frequency [Hz], relative level [dB])
    splash_spectrum = [(350, -8.5), (600, -2.5), (950, 13.5), (1300, -6.5), (1700, -2), (2300, 6.5),
                       (3100, -3.5), (5000, -23)]
    out, splash, t, gulps = np.zeros(N), np.zeros(N), np.arange(SR // 5) / SR, all_gulps()
    slap_spectrum = [(150, -19.5), (350, -12.5), (900, 14.0), (1300, -23.5), (2400, 1.5), (6000, -85)]
    slaps = rms_one(colour(rng.standard_normal(N), slap_spectrum))
    droplets = bubble_swarm(splash_spectrum, per_s=2000, spread_db=1.5, cycles=17)
    chances = rng.uniform(-1.28, 1, (len(gulps), 3))
    for (s, db, hz, rise, low_db, wet_db), (chance, *others) in zip(gulps, chances):
        column_hz, cloud_hz = in_time(FILLING, s)[0], in_time(CLOUD_PITCH, s)[0]
        onset = 1 - np.exp(-t / rise)
        glide = 1 + chirp * (t / (2 * rise) - 1)
        gulp = swell(t, rise) * np.sin(2 * np.pi * hz * t * glide)
        ring = from_db(ring_db - 60 * t / ring_t60) * onset * np.sin(2 * np.pi * column_hz * t)
        slap = from_db(slap_db) * np.exp(-t / slap_s) * np.roll(slaps, -round(s * SR))[:len(t)]
        # a few unlike bubbles in the cloud below
        neighbours = sum(np.sin(2 * np.pi * cloud_hz * (1 + neighbour_spread * abs(size)) * t)
                         for size in others)
        bubbles = np.sin(2 * np.pi * cloud_hz * (1 + cloud_detune * chance) * t)
        bubbles = bubbles - from_db(neighbour_db) * neighbours
        cloud = from_db(cloud_db - 60 * t / cloud_t60) * (1 - np.exp(-t / cloud_rise)) * bubbles
        add(out, s, from_db(db) * (gulp + ring + slap) - from_db(low_db) * cloud)
        add(splash, s, from_db(wet_db + splash_db) * np.exp(-t / splash_s))
    low_cut = signal.butter(4, low_cut_hz, "high", fs=SR, output="sos")
    return signal.sosfilt(low_cut, out + splash * droplets)


def room(x, first_echo_s=0.0016):
    """Reverberation: dense wall echoes decay exponentially, band by band."""
    # strength of the echoes: (frequency [Hz], level [dB])
    echo = [(100, -8), (350, 1), (650, -7), (1200, 4), (3000, -0.5), (7000, 4), (15000, 2)]
    # decay of the echoes: (frequency [Hz], 60 dB decay time [s])
    decay = [(100, 0.15), (650, 0.47), (3000, 0.49), (7000, 0.54), (15000, 0.22)]
    hz, spectra = diffuse(size=SR)
    t, centres = np.arange(SR) / SR, np.geomspace(60, 16000, 14)
    tail = 0
    for k, centre in enumerate(centres):
        share = at_hz(np.c_[centres, np.arange(len(centres)) == k], hz)
        fade = from_db(-60 * t / at_hz(decay, centre)) * np.clip(t / first_echo_s - 1, 0, 1)
        tail = tail + irfft(spectra * share, SR) * rms_one(fade) * from_db(at_hz(echo, centre))
    return signal.fftconvolve(x[None], tail, axes=1)[:, :N]


def shifting_room(x, count=4):
    """Geometry sets the echoes: their pattern crossfades at equal power as the drink's surface rises."""
    height = np.linspace(0, count - 1, N)
    return sum(room(x * np.sqrt(np.maximum(1 - abs(height - k), 0))) for k in range(count))


def scene(left_lag_s=.00015, ping_echo_db=-4.5, crackle_echo_db=-7, gulp_echo_db=-1.5):
    """Direct plus reverberant field: the mug sounds directly, a little later on the left, and by echoes."""
    # balance of the two microphones: (frequency [Hz], left minus right [dB])
    tilt = [(60, 2.5), (200, 3.5), (700, 0.9), (1300, 0.5), (2400, 0.1), (4400, 6), (6500, 5), (9000, -2.5),
            (11500, 8), (13500, 1.5), (15000, 11)]
    pouring = np.clip((TIME - .8) / 0.14, 0, 1)
    column_db, cloud_db = in_time(PLUNGING)
    splash_db, fizz_db = in_time(FROTHING)
    stream = trickle(column_db, cloud_db, splash_db) + foam(splash_db, fizz_db)
    rings, scatter = pings()
    ticks, gulps = pouring * crackle(fizz_db), glugs()
    mug = pouring * stream + bottom() + gurgles() + scatter + snaps() + knocks()
    mug = mug + rumbles() + rustles()
    near = mug + rings + ticks + gulps
    direct = np.array([np.roll(near, round(left_lag_s * SR)), near])
    # surface bubbles and the top of the foam reach the microphones more directly; gulps sound close and dry
    to_room = mug + from_db(ping_echo_db) * rings
    to_room = to_room + from_db(crackle_echo_db) * ticks + from_db(gulp_echo_db) * gulps
    left, right = direct + shifting_room(to_room)
    heard = [colour(side, [(hz, sign * db / 2) for hz, db in tilt])
             for side, sign in ((left, 1), (right, -1))]
    return np.array(heard) + background()


def record(dry, cutoff_hz=16300):
    """Band limiting: an elliptic low-pass cuts the top steeply."""
    return signal.sosfilt(signal.ellip(10, .1, 80, cutoff_hz, fs=SR, output="sos"), dry)


dry = scene()
out = record(dry)
dump_mix(out)
```